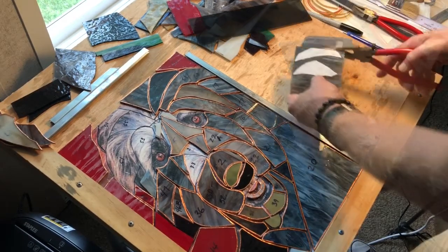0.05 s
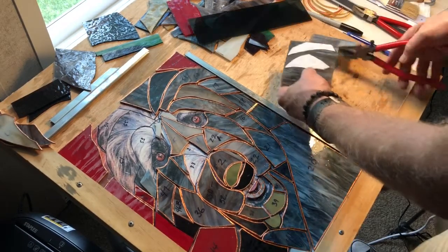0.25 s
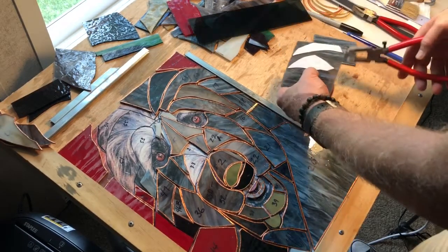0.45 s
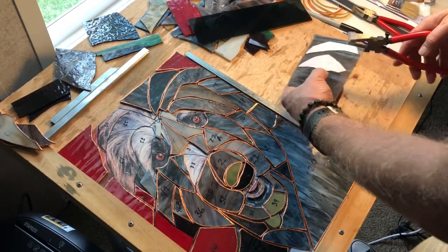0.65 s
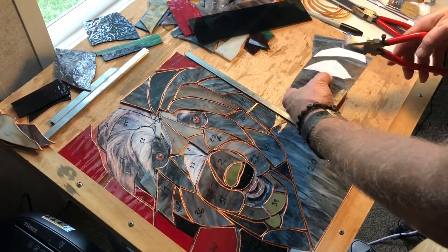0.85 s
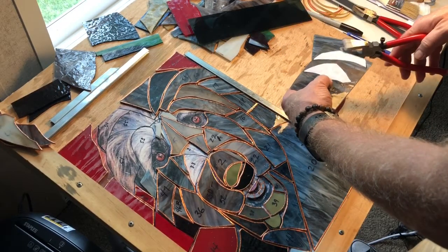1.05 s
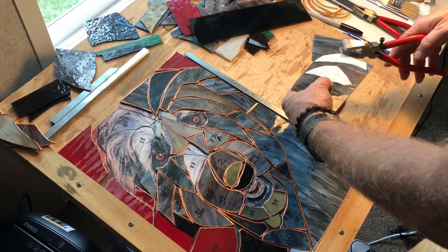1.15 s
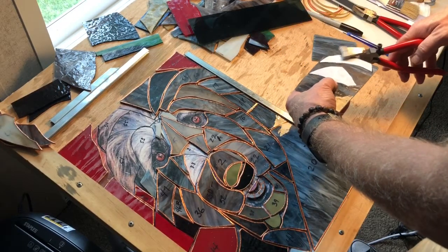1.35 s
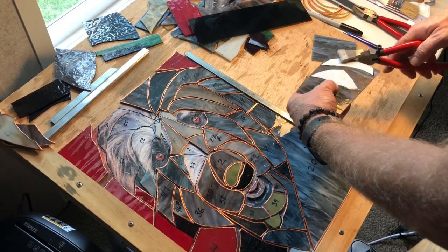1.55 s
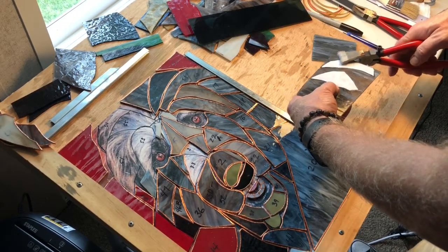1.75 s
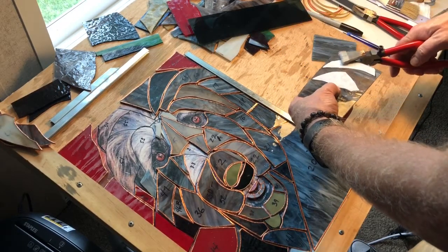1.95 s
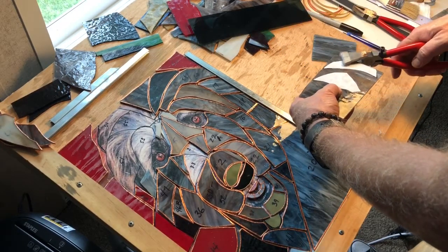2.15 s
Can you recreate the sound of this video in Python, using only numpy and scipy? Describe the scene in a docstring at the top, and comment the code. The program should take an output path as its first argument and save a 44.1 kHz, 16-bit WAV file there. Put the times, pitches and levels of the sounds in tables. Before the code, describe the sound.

A strip of glass breaks off in pliers, clinks quickly across a wooden workbench and slaps flat. The jaws then scrape faintly on glass. The microphone is close, in a small workshop with low hum and a distant cricket.

```python
"""A small workshop, one microphone near a wooden workbench. A strip of glass breaks off in the pliers,
clinks over the bench, ringing anew at each contact, and falls flat with a slap that chokes the ring.
The steel jaws then grind faintly on the edge of the sheet. Behind it lie room air and a machine hum,
and far off a cricket chirps with its wings."""
import sys
import numpy as np
from scipy import signal
from scipy.fft import rfft, irfft
from scipy.io import wavfile
from scipy.ndimage import uniform_filter1d

SR = 44100
rng = np.random.default_rng(int(sys.argv[2]) if len(sys.argv) > 2 else 0)


def generate_wav(sig):
    """Save sig (samples, or channels by samples) to the path in sys.argv[1] as 16-bit PCM at SR."""
    pcm = np.round(np.clip(np.atleast_2d(sig).T, -1, 1) * 32767).astype(np.int16)
    wavfile.write(sys.argv[1], SR, pcm)


N = 97020
HZ = np.fft.rfftfreq(N, 1 / SR)
T = np.arange(SR // 2) / SR  # time within one event, s

# spectrum of the room air: f/Hz, relative level/dB
AIR_SPECTRUM = [(12, -29), (20, -17), (46, 2), (81, -11), (110, 0), (182, -13.5), (241, -7.5), (270, -11.5),
                (301, -13), (388, -13), (1290, -12.5), (3740, -24), (4540, -26.5), (5080, -29.5),
                (16000, -45)]
# tones of the machine hum: f/Hz, rms level/dB
HUM_TONES = [(59.2, -65), (102.3, -78.5), (107, -64.5), (241, -67.5), (312.2, -73.5), (360.7, -73.5),
             (802, -76)]
# reverberation of the workshop: f/Hz, t60/s
ROOM_DECAY = [(100, 0.54), (500, 0.23), (2000, 0.24), (5000, .27), (9000, 0.223), (15000, 0.13)]
# the jaws bite the glass: t/s, level/dB, centre f/Hz
JAW_BITES = [(.005, -48.5, 12500), (0.027, -70, 10200), (0.055, -62, 12000), (.063, -63, 9600),
             (0.116, -54, 13300), (1.3622, -64, 10300), (1.387, -61, 10300), (1.4655, -68, 12000),
             (1.4769, -64.5, 11200), (1.5977, -61, 10260), (1.7069, -72, 10400), (1.7383, -72, 10400),
             (1.7797, -62, 14900), (1.8376, -65, 15400), (1.853, -59, 15400), (1.869, -60, 15400),
             (1.886, -65, 15400), (1.9089, -63, 15400), (1.976, -63, 15000)]
# the glass rubs in the jaws: t/s, length/s, level/dB, centre f/Hz
JAW_RUBS = [(0, 0.085, -69, 8860), (1.34, 0.18, -79, 10400), (1.594, 0.036, -80, 10380)]
# chirps of the far cricket: t/s, level/dB
CRICKET_CHIRPS = [(0.013, -59), (.492, -62), (.972, -61.5), (1.453, -61.5), (1.942, -61)]
# modes of the strip, one list each: f/Hz, relative level/dB, t60/s
MODE_HZ = [1799, 1944, 2103, 3667, 4122, 5040, 5918, 5980, 7780, 8238, 8361, 9948, 11375, 11595, 12580,
           13318, 14830]
MODE_DB = [-2.5, -2, 3.5, -0.5, 0, -6.5, 0.5, -8, -4.5, -10.5, 3, -9, 2, -0.5, -4, 2, -4]
MODE_T60 = [0.13, 0.12, 0.2, 0.11, 0.11, 0.14, 0.23, 0.13, 0.083, 0.11, 0.084, 0.094, 0.079, 0.079, 0.091,
            0.098, 0.16]
# bands in which a contact excites the strip: f/Hz
STRIKE_BANDS = [2000, 4000, 6000, 8300, 13000]
# the strip hits the bench: t/s, level/dB in each of the five STRIKE_BANDS, thump/dB, knock/dB, tick/dB
CONTACTS = [(0.1378, -60, -56, -64, -56.5, -60.5, -61.5, -59, -55),
            (0.161, -63, -46, -49, -53.5, -63, -43.5, -37.5, -37),
            (0.1637, -59, -41.5, -42.5, -37, -41.5, -40, -55, -44),
            (0.2013, -37, -50, -50, -36, -55, -41, -39.5, -31),
            (0.2267, -46.5, -56.5, -49.5, -53.5, -52.5, -45, -38.5, -46),
            (0.2536, -28.5, -26, -32.5, -29.5, -34, -39.5, -23.5, -30.5),
            (.2726, -41, -69, -44, -35, -29, -46.5, -46, -24),
            (.2838, -31, -16, -31, -30.5, -38, -48, -26, -27.5),
            (.2945, -28.5, -62, -31.5, -25, -38.5, -40, -40.5, -52),
            (0.328, -32, -23.5, -41, -50, -48, -37.5, -23.5, -48)]
# spectra of bench thump, knock on its top, glass-edge tick and final thud: f/Hz, relative level/dB
THUMP_SPECTRUM = [(50, -27.5), (135, -3), (210, -14), (295, 1), (420, -5.5), (640, -7.5), (1000, -19),
                  (3000, -56.5)]
KNOCK_SPECTRUM = [(150, -34), (550, -6.5), (1080, 1), (1800, -1.5), (2600, -4.5), (3400, -6), (5500, -17),
                  (16000, -43)]
TICK_SPECTRUM = [(300, -32.5), (2000, -6.5), (4500, -3), (7000, 1.5), (9000, -2), (10500, -13),
                 (13000, 2.5), (14100, -18), (15100, -8), (16000, -19.5)]
THUD_SPECTRUM = [(40, -44), (130, 0), (320, -4.5), (520, -24.5), (1050, -5.5), (1900, 10), (2800, 1.5),
                 (4900, -3), (6000, -15), (11800, -19), (16000, -34)]
# decay of the same four blows: f/Hz, t60/s
THUMP_DECAY = [(100, 0.21), (700, .11)]
KNOCK_DECAY = [(400, 0.026), (1100, 0.039), (5000, 0.059)]
TICK_DECAY = [(1000, 0.028), (16000, 0.04)]
THUD_DECAY = [(100, 0.1), (350, 0.24), (1100, 0.035), (5000, 0.023), (14000, .04)]
# points of the strip touch as it lands flat: t/s, peak level/dB, centre f/Hz, half-width/s
SLAP_PULSES = [(0.3844, -18, 3360, 0.00049), (.3850, -12.5, 1060, 0.00084), (.3851, -15, 2390, 0.00036),
               (.3871, -19.5, 4500, 0.00037), (0.3875, -36.5, 980, 0.0014), (.3924, -21, 470, 0.0011)]


def amp(db):
    """Decibels to gain."""
    return 10 ** (np.asarray(db) / 20)


def unit(x):
    """Scales to rms 1."""
    return x / np.sqrt(np.mean(x ** 2) + 1e-20)


def read(points, hz):
    """Reads a table on a log-frequency axis."""
    f, value = np.transpose(points)
    return np.interp(np.log(hz + 1), np.log(f + 1), value)


def fade(t60):
    """Exponential decay, 60 dB in t60 seconds."""
    return amp(-60 * T / t60)


def add(mix, start, sound):
    """Mixes a sound in at start seconds."""
    part = mix[max(round(start * SR), 0):][:len(sound)]
    part += sound[:len(part)]


def noise(gain):
    """Noise of rms 1 with the given relative gain at each of HZ."""
    return unit(irfft(gain * np.exp(2j * np.pi * rng.random(len(HZ))), N))


def dying(x, decay):
    """Lets each band of x die at its own speed, with a sharp start."""
    centres = np.geomspace(60, 16000, 10)
    spectrum = rfft(x)
    out = np.zeros(len(T))
    for hz, share in zip(centres, np.eye(len(centres))):
        band = irfft(spectrum * read(list(zip(centres, share)), HZ), N)
        out += band[:len(T)] * fade(read(decay, hz))
    return out


def burst(spectrum, decay):
    """A dense cluster of short-lived resonances set off by one blow."""
    return dying(noise(amp(read(spectrum, HZ))), decay)


def air_and_hum(air_db=-58.5, waver_rad=0.35):
    """Steady room air around the microphone and a slightly wavering machine hum."""
    t = np.arange(N) / SR
    hum = np.zeros(N)
    for hz, db in HUM_TONES:
        phase = 2 * np.pi * (hz * t + rng.random())
        drift = waver_rad * noise(np.exp(-HZ / 3))
        hum += amp(db) * np.sqrt(2) * np.sin(phase + drift)
    return amp(air_db) * noise(amp(read(AIR_SPECTRUM, HZ))) + hum


def pliers():
    """Steel jaws on glass: tiny high bites and thin gritty rubs."""
    def grit(hz, width_hz, floor):
        return noise(1 / (1 + ((HZ - hz) / width_hz) ** 2) + floor)[:len(T)]
    out = np.zeros(N)
    for start, db, hz in JAW_BITES:
        add(out, start, amp(db) * grit(hz, width_hz=200, floor=0.12) * fade(t60=0.026))
    for start, length, db, hz in JAW_RUBS:
        roughness = unit(uniform_filter1d(rng.standard_normal(len(T)), size=160))
        grain = unit(amp(2.6 * roughness))  # the level flickers by 2.6 dB rms
        swell = np.sqrt(abs(np.sin(np.pi * np.minimum(T / length, 1))))
        add(out, start, amp(db) * grit(hz, width_hz=130, floor=0.046) * grain * swell)
    return out


def room(x, delay_s=0.0032):
    """The workshop's diffuse tail, reaching the microphone just after the direct sound."""
    tail = dying(noise(1), ROOM_DECAY) * np.clip(T / delay_s - 1, 0, 1)
    return signal.fftconvolve(x, tail / np.linalg.norm(tail))[:N]


def cricket(pitch_hz=4760, sag_hz=440, stroke_s=0.022, spacing_s=0.0385, echo_s=0.016):
    """Far off, three wing strokes a chirp, each sagging in pitch, with an echo and much room."""
    progress = np.arange(0, stroke_s, 1 / SR) / stroke_s
    phase = 2 * np.pi * np.cumsum(pitch_hz - sag_hz * progress ** 2) / SR
    stroke = np.sin(np.pi * progress) * np.sin(phase)
    out = np.zeros(N)
    for start, db in CRICKET_CHIRPS:
        for k, accent_db in enumerate((-3, 0, 0)):
            direct = amp(db + accent_db) * stroke
            echo = 0.84 * direct * (1 - progress)
            add(out, start + k * spacing_s, direct)
            add(out, start + k * spacing_s + echo_s, echo)
    return out + 0.82 * room(out)


def glass_ring(rise_s=0.0018, choke_s=0.004, surviving_share=0.55):
    """Every contact damps the strip's modes and strikes them anew; lying flat chokes them."""
    out = np.zeros(N)
    landing = SLAP_PULSES[0][0]
    for start, *band_db, _, _, _ in CONTACTS:
        t = start + T
        strike = list(zip(STRIKE_BANDS, band_db))
        ring = sum(amp(db + read(strike, hz)) * fade(t60) * np.sin(2 * np.pi * hz * T)
                   for hz, db, t60 in zip(MODE_HZ, MODE_DB, MODE_T60))
        attack = np.minimum(T / rise_s, 1)
        hits_since = sum(np.clip((t - hit) / choke_s, 0, 1) for hit, *_ in CONTACTS if hit > start)
        choke = np.exp(-np.maximum(t - landing, 0) / choke_s)
        add(out, start, ring * attack * surviving_share ** hits_since * choke)
    return out


def bench_knocks(thump_rise_s=0.0037):
    """Each contact also thumps the bench, knocks its top and ticks at the glass edge."""
    out = np.zeros(N)
    for start, *_, thump_db, knock_db, tick_db in CONTACTS:
        thump = amp(thump_db) * burst(THUMP_SPECTRUM, THUMP_DECAY) * np.minimum(T / thump_rise_s, 1)
        knock = amp(knock_db) * burst(KNOCK_SPECTRUM, KNOCK_DECAY)
        tick = amp(tick_db) * burst(TICK_SPECTRUM, TICK_DECAY)
        add(out, start, thump + knock + tick)
    return out


def slap(thud_db=-19.5):
    """Brief pressure pulses as the strip lands flat; the bench thuds under the strongest."""
    out = np.zeros(N)
    for touch, db, hz, half_width in SLAP_PULSES:
        t = np.arange(N) / SR - touch
        out += amp(db) * np.exp(-(t / half_width) ** 2) * np.cos(2 * np.pi * hz * t)
    add(out, SLAP_PULSES[1][0], amp(thud_db) * burst(THUD_SPECTRUM, THUD_DECAY))
    return out


def scene():
    """Glass and bench close up with a little room; cricket, air and hum behind them."""
    glass = glass_ring() + pliers()
    blows = bench_knocks() + slap()
    reverb = room(amp(-11) * glass + amp(-9) * blows)
    return (glass + blows + reverb + cricket() + air_and_hum())[None]


def record(dry, low_cut_hz=37.7, high_cut_hz=16100):
    """The microphone feeds the recorder's low cut and band limit."""
    low_cut = signal.butter(6, low_cut_hz, btype="high", fs=SR, output="sos")
    band_limit = signal.firwin(255, high_cut_hz, window=("kaiser", 8), fs=SR)
    return signal.oaconvolve(signal.sosfilt(low_cut, dry), band_limit[None], "same")


dry = scene()
out = record(dry)
generate_wav(out)
```